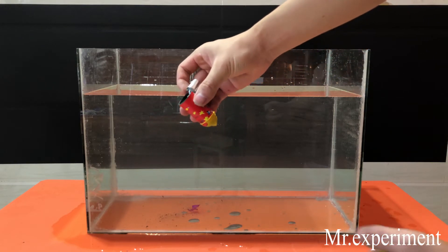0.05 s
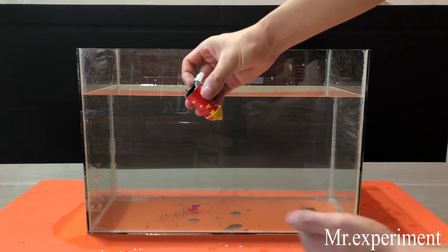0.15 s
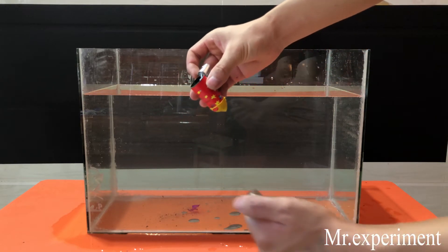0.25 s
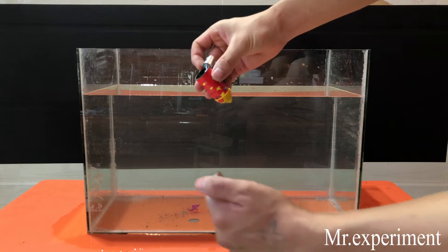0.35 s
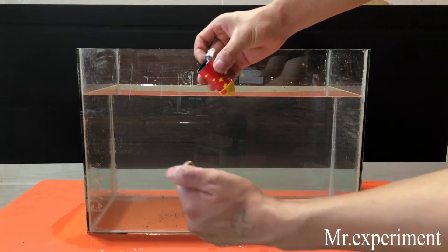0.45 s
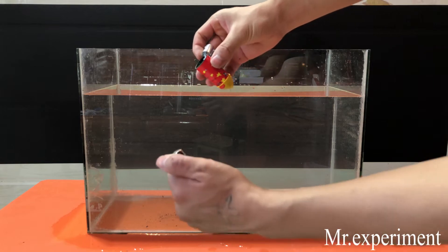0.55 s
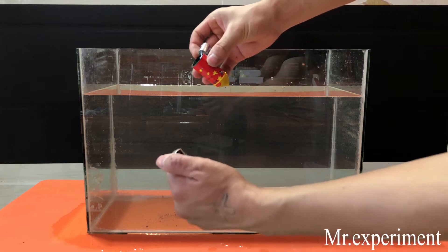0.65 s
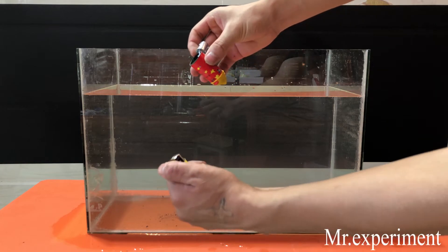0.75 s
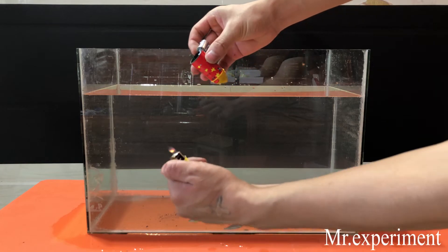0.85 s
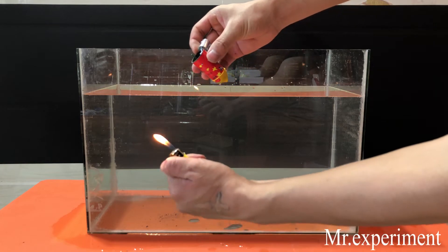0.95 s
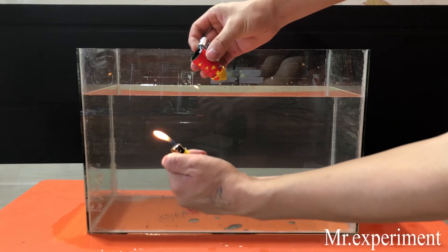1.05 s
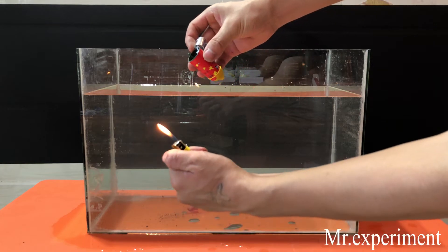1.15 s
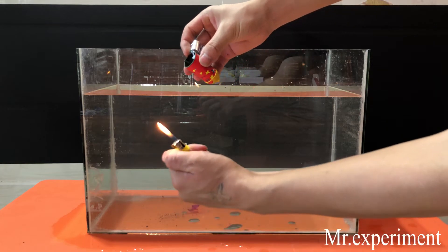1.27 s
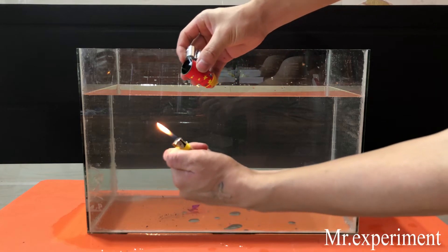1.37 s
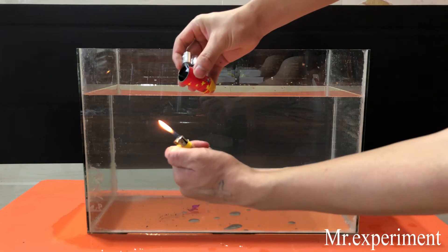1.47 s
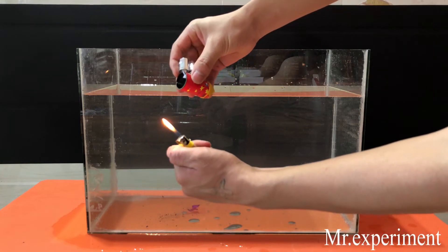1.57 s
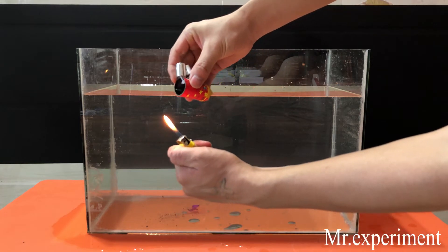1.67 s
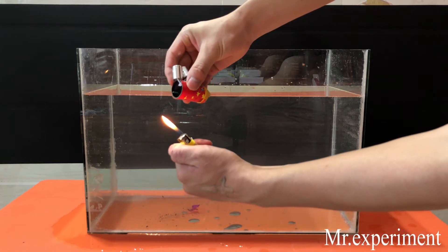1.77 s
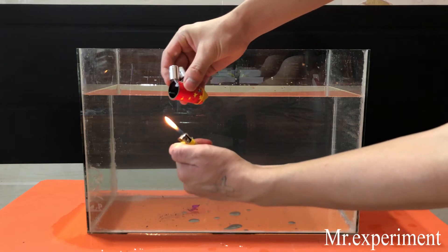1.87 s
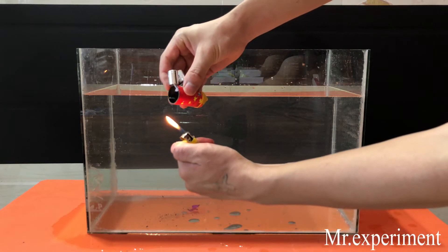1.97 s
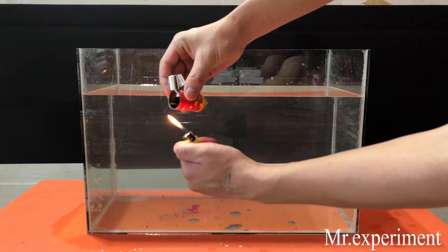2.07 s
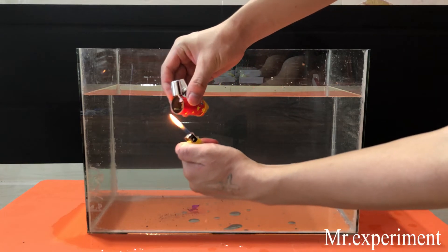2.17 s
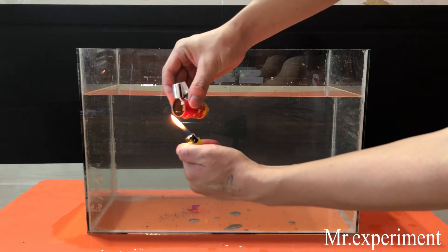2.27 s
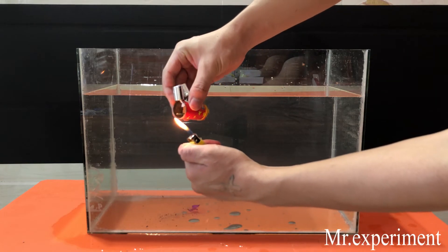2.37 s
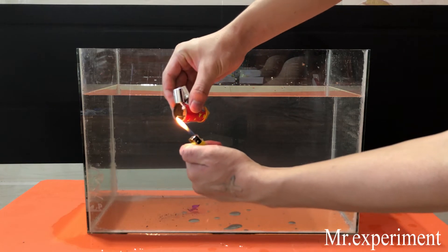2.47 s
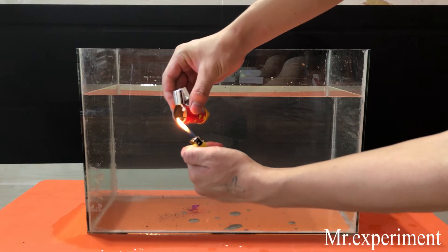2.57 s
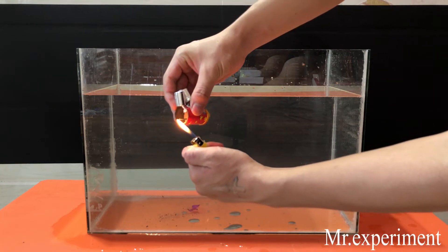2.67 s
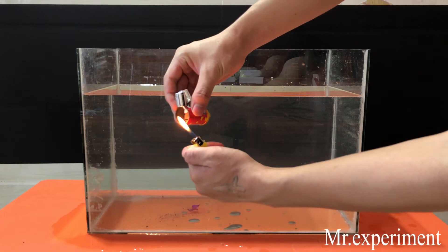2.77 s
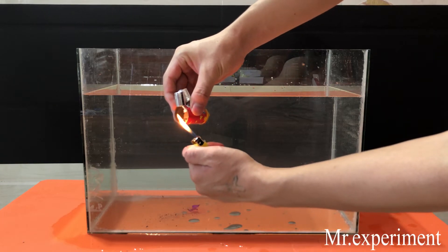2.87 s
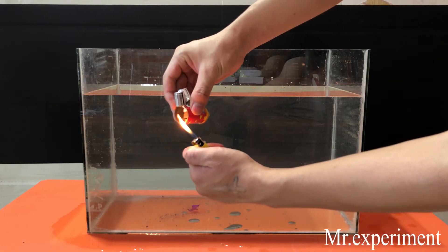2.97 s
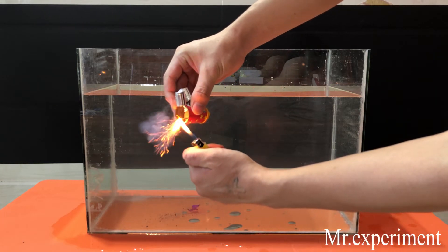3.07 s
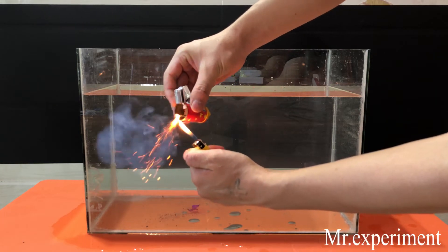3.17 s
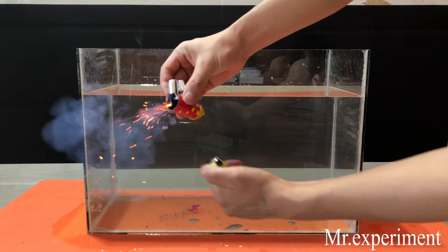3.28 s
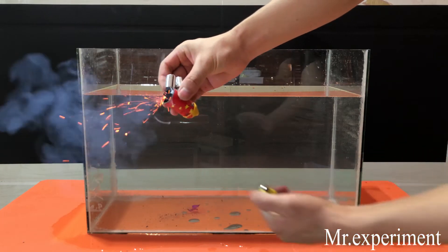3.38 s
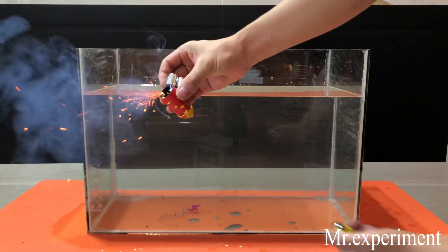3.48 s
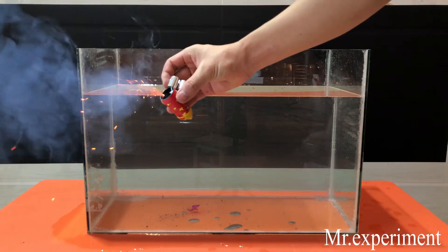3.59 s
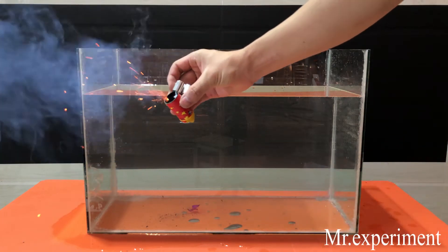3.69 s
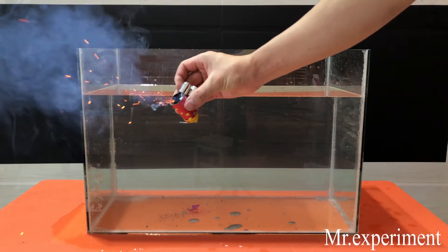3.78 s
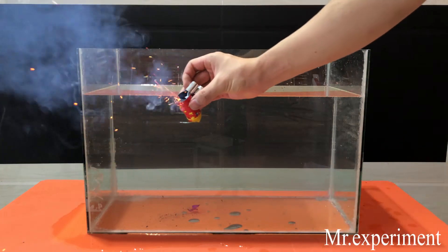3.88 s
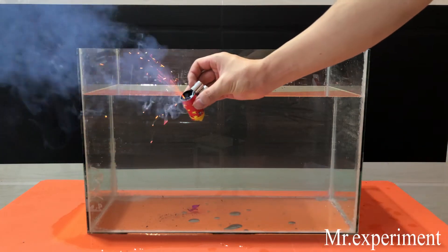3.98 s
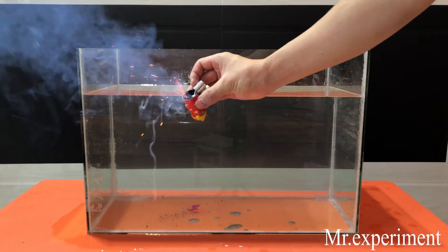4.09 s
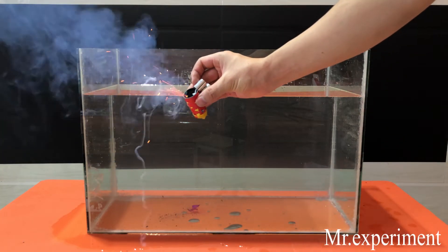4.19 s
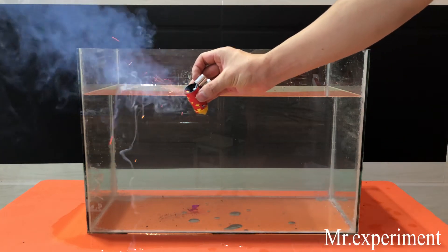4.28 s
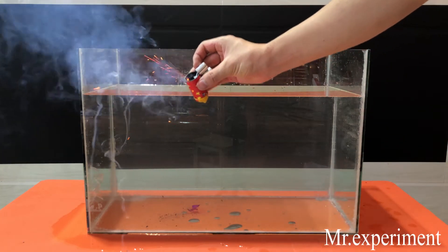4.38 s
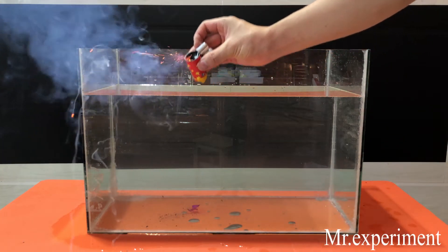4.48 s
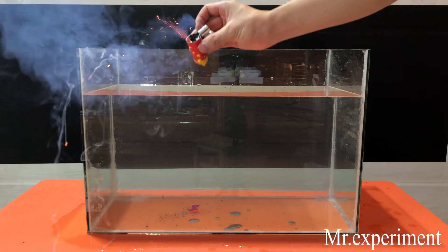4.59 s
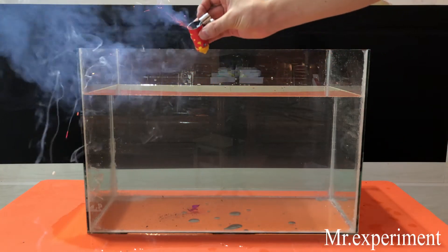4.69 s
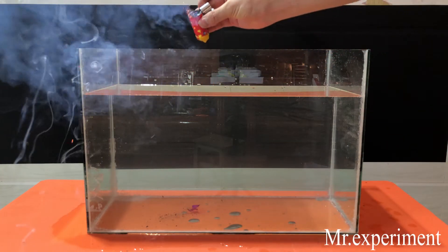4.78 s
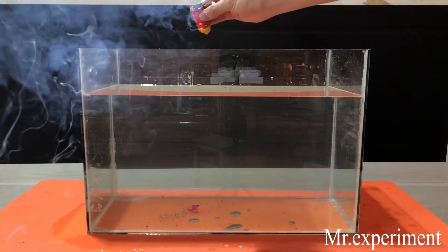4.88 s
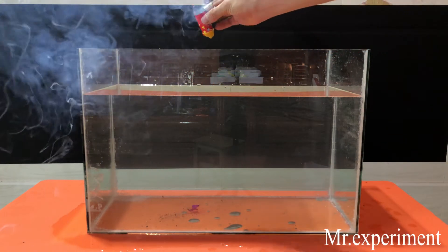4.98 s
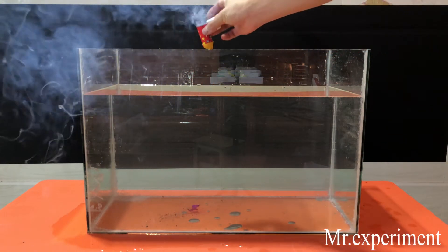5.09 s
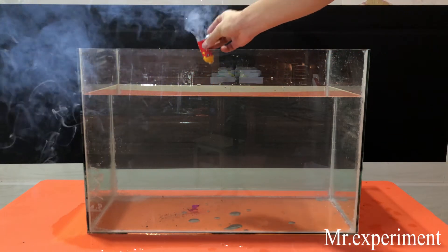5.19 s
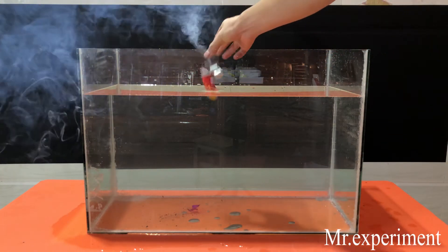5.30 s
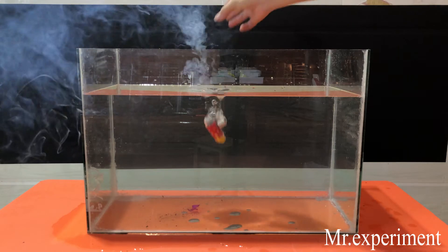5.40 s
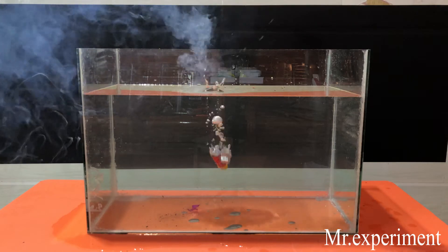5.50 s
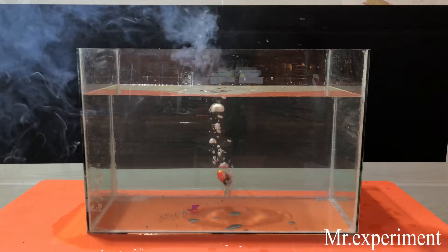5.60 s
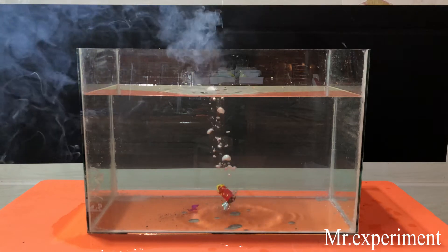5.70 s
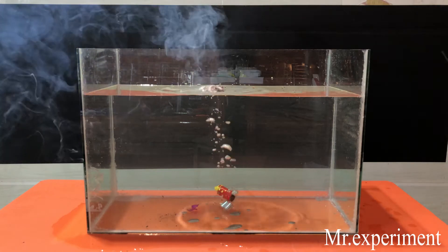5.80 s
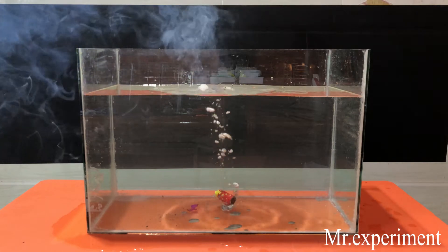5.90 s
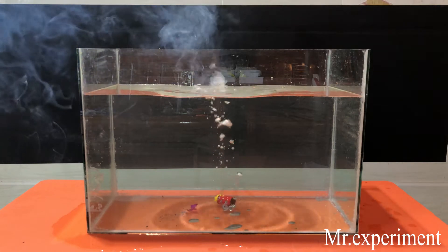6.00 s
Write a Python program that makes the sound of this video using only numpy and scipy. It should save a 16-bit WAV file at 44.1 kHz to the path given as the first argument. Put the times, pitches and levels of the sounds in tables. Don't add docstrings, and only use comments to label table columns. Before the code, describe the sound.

Sharp lighter click, then a sparking fuse's rushing hiss with a rising hollow note, ending in a small splash, bubbling gas and hard knocks on glass.

```python
import sys
import numpy as np
from scipy import signal
from scipy.io import wavfile
from scipy.ndimage import uniform_filter1d, map_coordinates

SR = 44100
rng = np.random.default_rng(int(sys.argv[2]) if len(sys.argv) > 2 else 0)


def gain_from_db(level_db):
    decades = np.asarray(level_db, float) / 20
    return 10 ** decades


def file_out(sig):
    cols = np.atleast_2d(sig).T
    lim = np.clip(cols, -1, 1)
    pcm = np.round(lim * 32767).astype(np.int16)
    wavfile.write(sys.argv[1], SR, pcm)


N = 266805
T = np.arange(N) / SR

# [f/Hz, density/dB per Hz]
AIR_SPECTRUM = [(18, -51), (33, -17), (65, -19.5), (86, -10.5), (185, -13), (291, -17.5), (314, -19.5),
                (533, -22.5), (577, -26), (858, -29.5), (1940, -38), (7670, -45), (16500, -49.5)]
# [f/Hz, width/Hz, level/dB]
VENT_TONES = [(100.3, 15.846, -66), (237.5, 21.2, -73), (290, 27.9, -72.5)]
# [f/Hz, t60/s]
ROOM_T60 = [(300, 0.91), (1300, 0.999), (3500, 0.88815), (9000, 0.655), (15000, 0.40665)]
# [delay/ms, drift/ms per s, share/1]
WALLS = [(.4, -0.0027, .5), (1.25, -0.19, 0.34), (3.25, -.15, 1.21)]
# [f/Hz, level/dB]
TABLE_COMB = [(3300, 0), (3600, 0), (3850, -3.5), (4300, -1), (5000, -2.64)]

# [f/Hz, level/dB, t60/s]
LIGHTER_MODES = [(2200, 0.5, 0.019), (2921.5, -2, 0.0032), (6830, -10.5, 0.0077), (9840, -10, 0.016),
                 (13000, -14, .003), (15250, -9.5, 0.002)]
# [t/s, peak level/dB, tilt/dB per octave, room share/dB]
SNAPS = [(0.0597, -42.5, 2.5, -1), (0.673, -59, -16, -8.5), (.7213, -50.5, 8, 1.5), (0.7624, -59, -22, -3),
         (.775, -62, -17, -1), (0.8275, -53, -0.5, 6), (0.8487, -9.5, 3.5, 6), (0.851, -11, 3, -13),
         (1.15, -56.5, 4, -5.5), (1.173, -45, 2, -5), (1.266, -40.5, 3, -0.5), (1.5066, -39, 4.5, -0.5),
         (3.2905, -20, 7.5, -18)]
# [f/Hz, density/dB per Hz]
SCRAPE_SPECTRUM = [(530, -73), (900, -30.5), (2270, -2.5), (3080, 0.5), (3970, -11), (5190, -2), (6460, -3),
                   (9090, -10.5), (9780, -4.5), (11500, -11), (15200, -6), (15900, -10), (16500, -29.5)]
# [start t/s, length/s, f/Hz, width/Hz, level/dB]
RUBS = [
    (0.45, 0.0858, 2388, 150, -78.5),
    (0.508, 0.1078, 2422, 200, -82),
    (0.555, 0.24, 9720, 500, -82),
    (0.579, 0.19, 13000, 600, -77.5),
    (0.668, 0.0977, 2200, 400, -78),
]

# [t/s, level/dB, rattle length/s, tilt/dB per octave]
KNOCKS = [
    (5.6603, -13, .0068, 0.3),
    (5.6728, -16, .004, 0.3),
    (5.69, -20, .006, -1.5),
    (5.727, -25, .006, -2.5),
    (5.901, -26, .0035, -2.5),
    (5.9255, -27, .006, 1.5),
    (5.952, -32, .004, -1.5),
]
# [f/Hz, density/dB per Hz]
KNOCK_SPECTRUM = [(180, -42), (300, -11.5), (800, -15), (1200, -8.5), (2130, -8), (3300, -6), (4000, -5),
                  (4700, -3.5), (6450, -6.5), (16000, -20.5)]
# [f/Hz, level/dB, t60/s]
GLASS_MODES = [(555, -28, .4), (1099, -11, .35), (1310, -22, .12), (1435, -22, .15), (1725, -22, .15),
               (2137, -20, .15), (3321, -17, .2), (3390, -20, .2), (4485, -22, .15), (4833, -20, .25),
               (5312, -21, .2), (6640, -24, .15)]
# [f/Hz, width/Hz, level/dB]
SHELL = (3280, 290, 0.5)

# [t/s, level/dB, f/Hz, t60/s]
BUBBLES = [(5.402, -27.5, 304, 0.093), (5.414, -41, 244, 0.038), (5.434, -26, 408.8, 0.015),
           (5.459, -29, 295.8, 0.02648), (5.485, -35, 307, 0.0789), (5.499, -32.5, 290, .04),
           (5.633, -32, 291, 0.0739), (5.686, -25, 236, 0.0628), (5.7, -35.5, 152.7, 0.517),
           (5.86, -31, 370, 0.098), (5.986, -32.5, 358, 0.18)]
# [t/s, extra level/dB, dying time/s]
GULPS = [
    (5.403, 10.5, 0.0123),
    (5.68, 1.5, 0.207),
]
# [f/Hz, density/dB per Hz]
SPRAY_SPECTRUM = [(300, -13), (800, -9), (1500, 7), (3000, 3), (6000, -5.5), (9500, -8), (16000, -23)]
# [t/s, level/dB, f/Hz, t60/s]
DROPS = [
    (5.322, -44, 2510, 0.0643),
    (5.352, -46, 2500, 0.0436),
    (5.353, -40, 1686, 0.0977),
    (5.368, -45, 1185, 0.15),
    (5.4, -41.5, 1407, 0.0697),
    (5.415, -46, 1720, 0.055),
]
# [peak t/s, rise/s, fall/s, level/dB]
WHISTLE = (5.19, .025, .08, -57)

# [t/s, jet level/dB, flame shrouded by casing/0-1]
FUSE = [
    (3.021, -50, .1),
    (3.25, -52, 0.01),
    (3.45, -51.5, 0.1),
    (3.9, -52, 0.11),
    (4.35, -50, 0.61),
    (4.75, -50, 0.81),
    (5.0, -55, 0.93),
    (5.22, -54.5, 0.93),
    (5.3, -55, 0.36),
]
# [t/s, level/dB, half length/s]
FLARES = [(3.147, 1, 0.01896), (3.284, 2, 0.013), (3.51, -0.5, 0.01536), (3.715, 1, 0.0747),
          (3.818, -4, .025), (3.867, 3, 0.0258), (3.965, 0.5, .02), (4.111, 3, 0.015), (4.31, 2.4, 0.039),
          (4.41, -2.5, .04), (4.51, 2, 0.064), (4.9, 0.5, 0.03226)]
# [t/s, f/Hz]
NOTE = [(3.0, 2970), (3.6, 2800), (4.15, 3030), (4.55, 3080), (4.8, 3320), (5.05, 3550), (5.2, 3370),
        (5.3, 2850), (5.45, 1790)]
# [multiple of note/1, width/Hz, level/dB, ignition level re full/dB]
CASING_MODES = [(2.74, 1095, -9, -28), (4.56, 2300, -0.3225, -16)]
# [f/Hz, density/dB per Hz]
ROAR_SPECTRUM = [(60, -4), (150, 0), (400, -6.5), (1000, -4), (1800, -1.5), (2600, -7.5), (3500, -19.5),
                 (5000, -15)]
# [f/Hz, density/dB per Hz]
HISS_SPECTRUM = [(2500, -33), (4000, -8), (5500, -4), (8000, -2), (11300, -3), (12200, -2.5), (15000, 0.5)]


def evened(x):
    return x / np.sqrt(np.mean(x ** 2) + 1e-20)


def read(points, hz):
    f, value = np.transpose(points)
    return np.interp(np.log(hz + 1), np.log(f + 1), value)


def coloured(x, points, tilt_db=0):
    hz = np.abs(np.fft.fftfreq(8192, 1 / SR))
    gain_db = read(points, hz) + tilt_db * np.log2((hz + 300) / 4000)
    log_gain = np.log(gain_from_db(gain_db))
    taps = np.fft.ifft(np.exp(np.conj(signal.hilbert(log_gain)))).real[:4096]
    return signal.oaconvolve(x, taps)[:len(x)]


def add(mix, start_s, sound):
    part = mix[round(start_s * SR):][:len(sound)]
    part += sound[:len(part)]


def resonate(x, hz, width_hz):
    turn = np.exp(2j * np.pi * np.cumsum(hz * np.ones(len(x))) / SR)
    pole = np.exp(-np.pi * width_hz / SR)
    smooth = signal.lfilter([1 - pole], [1, -pole], x / turn)
    return 2 * (turn * smooth).real


def resonate_twice(x, hz, width_hz):
    return resonate(resonate(x, hz, width_hz), hz, width_hz)


def ring(modes, seconds, tilt_db=0):
    t = np.arange(round(seconds * SR)) / SR
    out = np.zeros(len(t))
    for hz, db, t60_s in modes:
        level_db = db + tilt_db * np.log2(hz / 5000) - 60 * t / t60_s
        out += gain_from_db(level_db) * np.sin(2 * np.pi * hz * t)
    return out


def wobble(seconds):
    size = max(round(seconds * SR), 2)
    once = uniform_filter1d(rng.standard_normal(N), size)
    return evened(uniform_filter1d(once, size))


def bubble(hz, t60_s, glide_per_s):
    t = np.arange(round(.12 * SR)) / SR
    envelope = gain_from_db(-60 * t / t60_s) * (1 - np.exp(-t / 0.001206))
    return envelope * np.sin(2 * np.pi * hz * (t + glide_per_s * t ** 2))


def air():
    out = gain_from_db(-63.5) * evened(coloured(rng.standard_normal(N), AIR_SPECTRUM))
    for hz, width_hz, db in VENT_TONES:
        out += gain_from_db(db) * evened(resonate_twice(rng.standard_normal(N), hz, width_hz))
    return out


def room(x):
    taps = np.zeros(SR + SR // 2)
    at = np.arange(130, len(taps) - 10, 10)
    taps[at + rng.integers(0, 10, len(at))] = rng.choice([-1., 1.], len(at))
    hz, t, bands = signal.stft(taps, SR, nperseg=256)
    decay = gain_from_db(-60 * t / read(ROOM_T60, hz)[:, None])
    tail = signal.istft(bands * decay, SR, nperseg=256)[1]
    return signal.fftconvolve(x, tail / np.linalg.norm(tail))[:N]


def echoed(x):
    late = np.zeros(N)
    for delay_ms, drift_ms_per_s, share in WALLS:
        lag_s = (delay_ms + drift_ms_per_s * (T - FUSE[0][0])) / 1000
        late += share * map_coordinates(x, [(T - lag_s) * SR], order=3)
    nearest_s, near_span_s = 4.18, 0.42
    echo_db = -24 + 11.5 * np.exp(-((T - nearest_s) / near_span_s) ** 2)
    return x + gain_from_db(echo_db) * late


def lighter():
    out = np.zeros((2, N))
    scrapes = rng.standard_normal((len(SNAPS), 200))
    near = signal.butter(4, 1200, "high", fs=SR, output="sos")
    far = signal.butter(6, 1450, "high", fs=SR, output="sos")
    for (s, db, tilt_db, room_db), scrape in zip(SNAPS, scrapes):
        dying = np.pad(scrape * np.exp(-np.arange(200) / 63.0), (0, 1500))
        feeds = (out[0], near, .35, db), (out[1], far, .05, db + room_db)
        for feed, thin, rough, feed_db in feeds:
            blow = signal.unit_impulse(1700) + rough * dying
            body = signal.oaconvolve(blow, ring(LIGHTER_MODES, .03, tilt_db))[:len(blow)]
            scraped = evened(coloured(blow, SCRAPE_SPECTRUM, tilt_db))
            snap = signal.sosfilt(thin, scraped + 0.33 * evened(body))
            add(feed, s, gain_from_db(feed_db) * snap / abs(snap).max())
    for s, seconds, hz, width_hz, db in RUBS:
        rub = resonate(rng.standard_normal(round(seconds * SR)), hz, width_hz)
        add(out[0], s, gain_from_db(db) * evened(rub) * np.hanning(len(rub)))
    return out


def knocks():
    out = np.zeros((2, N))
    rattles = rng.standard_normal((len(KNOCKS), 1000))
    t = np.arange(1000) / SR
    build = 1 - np.exp(-np.arange(SR // 2) / (0.033 * SR))
    panes = ring(GLASS_MODES, .5) * build
    shell_hz, shell_width_hz, shell_db = SHELL
    for (s, db, seconds, tilt_db), rattle in zip(KNOCKS, rattles):
        contact = np.pad(rattle * np.exp(-(t / seconds) ** 4), (0, 2000))
        length_gain = np.sqrt(seconds * SR)
        for feed, force in zip(out, (contact, signal.unit_impulse(3000))):
            crack = coloured(force, KNOCK_SPECTRUM, tilt_db)
            add(feed, s, gain_from_db(db) * crack / np.linalg.norm(crack) * length_gain)
        shell = resonate_twice(contact, shell_hz, shell_width_hz)
        add(out[0], s, gain_from_db(db + shell_db - 6.5) * shell / np.linalg.norm(shell) * length_gain)
        add(out[0], s, gain_from_db(1.85 * db + 14.5) * panes)
    return out


def gurgle():
    stream, out = np.zeros(N), np.zeros(N)
    for when, pitch, size, glide in rng.random((700, 4)):
        one = bubble(205 * 2.3 ** pitch, 0.12926, 3 * (glide - .4))
        add(stream, 5.4 + .65 * when, gain_from_db(4.9 * size) * one)
    for s, db, hz, t60_s in BUBBLES:
        add(out, s, 0.71 * gain_from_db(db) * bubble(hz, t60_s, 2.08))
    rms = np.sqrt(np.mean(stream[T > 5.41] ** 2))
    stream_db = -48 - 2 * (T - 6.04)
    for s, db, dying_s in GULPS:
        stream_db += db * (T > s) * np.exp(-(np.maximum(T - s, 0) / dying_s) ** 2)
    return out + gain_from_db(stream_db) * stream / rms


def splash():
    spray = rng.standard_normal(N) * gain_from_db(wobble(0.0071))
    pocket_start_hz, pocket_end_hz, pocket_fall_s = 2951.4, 850, 0.059
    sink = np.exp(-np.maximum(T - 5.3, 0) / pocket_fall_s)
    pocket_hz = pocket_end_hz + (pocket_start_hz - pocket_end_hz) * sink
    pocket = evened(resonate(spray, pocket_hz, 592.5))
    fizz = evened(coloured(spray, SPRAY_SPECTRUM)) + 1.37 * pocket
    after_s = T - 5.354
    rise_db_per_s, fall_db_per_s = 330.0, -110.0
    burst = gain_from_db(-52.5 + np.minimum(rise_db_per_s * after_s, fall_db_per_s * after_s))
    out = (burst + gain_from_db(-67.0) * (after_s > 0)) * fizz
    for s, db, hz, t60_s in DROPS:
        add(out, s, gain_from_db(db) * bubble(hz, t60_s, -.3))
    return out


def whistle():
    s, rise_s, fall_s, db = WHISTLE
    start_hz, end_hz, sag_s = 2800, 2520, .055
    hz = end_hz + (start_hz - end_hz) * np.exp(-np.maximum(T - s + rise_s, 0) / sag_s + .5)
    tone = evened(resonate(rng.standard_normal(N), hz, 40))
    return gain_from_db(db) * tone * np.exp(-((T - s) / np.where(T < s, rise_s, fall_s)) ** 2)


def burning_gas():
    sparks_per_s = 2400
    spark_db = 1.9 * np.minimum(rng.exponential(1, N), 5)
    sparks = gain_from_db(spark_db) * (rng.random(N) < sparks_per_s / SR)
    uneven_db = .7 * wobble(0.02) + 1.6 * wobble(0.0028)
    burn = (1 + 0.28 * evened(sparks)) * gain_from_db(uneven_db)
    return burn * rng.standard_normal((4, N))


def fuse():
    s, jet_points_db, shroud_points = np.transpose(FUSE)
    jet_db = np.interp(T, s, jet_points_db)
    shroud = np.interp(T, s, shroud_points)
    flare_db = sum(db * np.exp(-((T - at) / half_s) ** 2) for at, db, half_s in FLARES)
    bright_db = 0.6 * flare_db
    gas = burning_gas()

    young = np.clip(1 - (T - s[0]) / 0.47, 0, 1)
    note_hz = np.interp(T, *np.transpose(NOTE))
    first = evened(resonate(resonate(gas[0], 1.065 * note_hz, 870), 0.85 * note_hz, 1500))
    first *= gain_from_db(-4.5 * young)

    upper_hz = np.maximum(note_hz, 3380 * (T > 5.05))
    upper = np.zeros(N)
    for multiple, width_hz, db, start_db in CASING_MODES:
        mode = evened(resonate_twice(gas[1], multiple * upper_hz, width_hz))
        upper += gain_from_db(db + start_db * young) * mode
    swing_db = -48 * np.maximum(T - 5.12, 0)
    upper *= gain_from_db(5.5 + swing_db + bright_db)

    roar = gain_from_db(2 - 6 * shroud) * evened(coloured(gas[2], ROAR_SPECTRUM))
    catch_s, catch_span_s = 3.27, .04
    catch_db = -8 * np.clip(.5 - (T - catch_s) / (2 * catch_span_s), 0, 1)
    hiss_db = 14.5 - 20 * shroud + catch_db + bright_db
    hiss = gain_from_db(hiss_db) * evened(coloured(gas[3], HISS_SPECTRUM))

    alight = np.clip((T - 3.006) / 0.02, 0, 1) * np.clip((5.52 - T) / 0.18, 0, 1)
    return gain_from_db(jet_db + flare_db) * alight * (first + upper + roar + hiss)


def scene():
    snaps, snaps_far = lighter()
    hits, hits_far = knocks()
    flow = echoed(coloured(fuse(), TABLE_COMB)) + splash() + whistle()
    wet = room(snaps_far + gain_from_db(1.5) * hits_far + gain_from_db(-6.5) * flow)
    mix = snaps + hits + gain_from_db(-2.5) * flow + gurgle() + wet + air()
    return np.tile(mix, (2, 1))


def low_pass(x):
    return signal.sosfilt(signal.butter(12, 16820, fs=SR, output="sos"), x)


def record(dry):
    cut = signal.sosfilt(signal.butter(4, 48, "high", fs=SR, output="sos"), dry)
    rounded = .8 * np.tanh(cut / .8)
    limited = signal.oaconvolve(rounded, signal.firwin(511, 15900, fs=SR)[None], "same")
    return low_pass(limited)


dry = scene()
out = record(dry)
file_out(out)
```